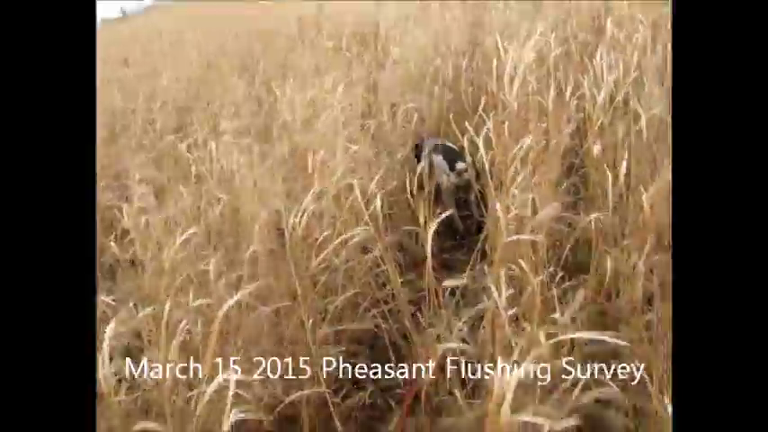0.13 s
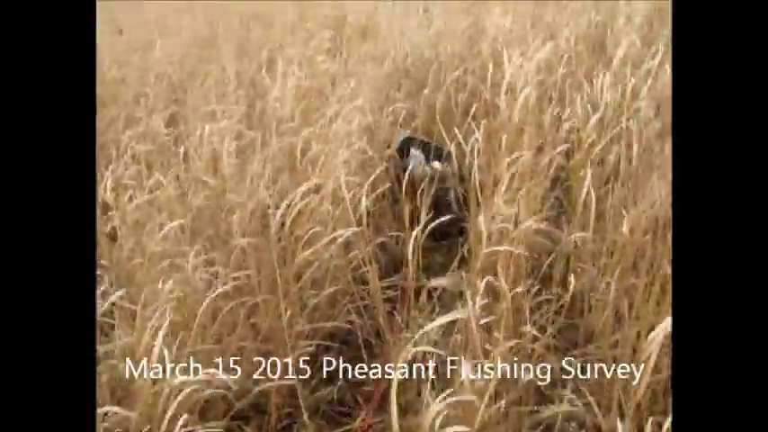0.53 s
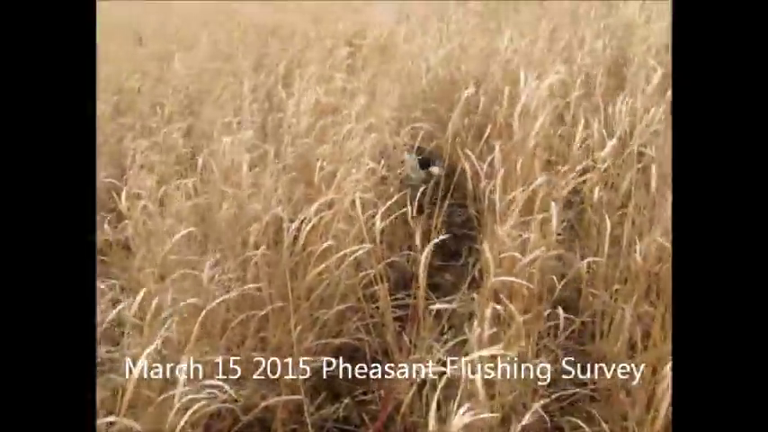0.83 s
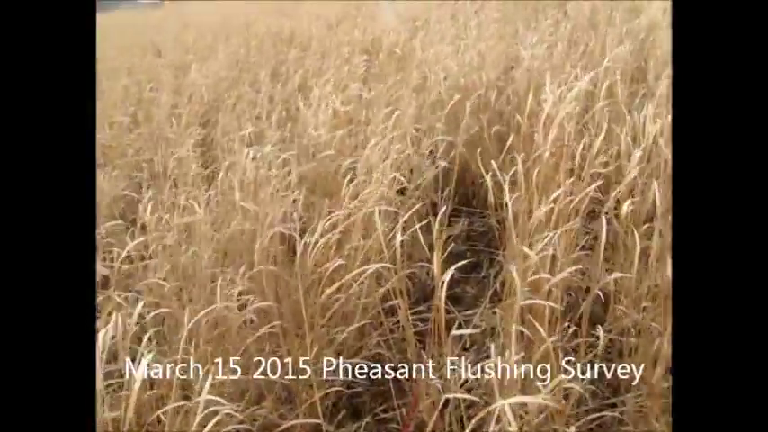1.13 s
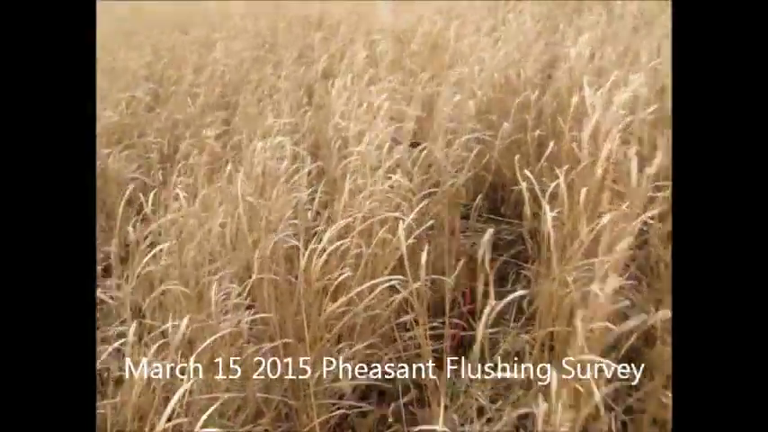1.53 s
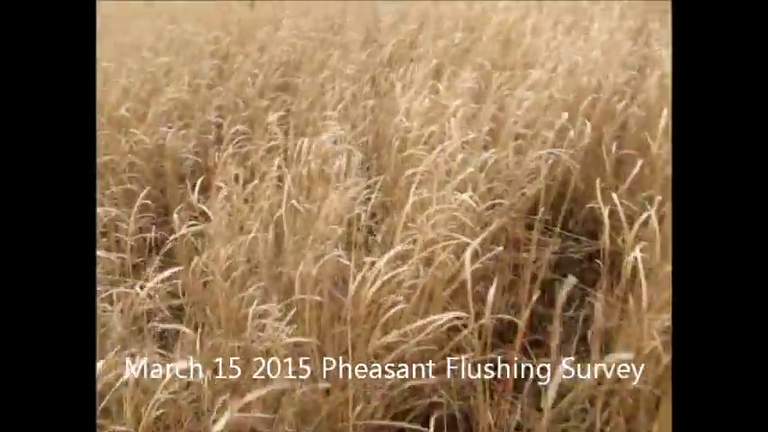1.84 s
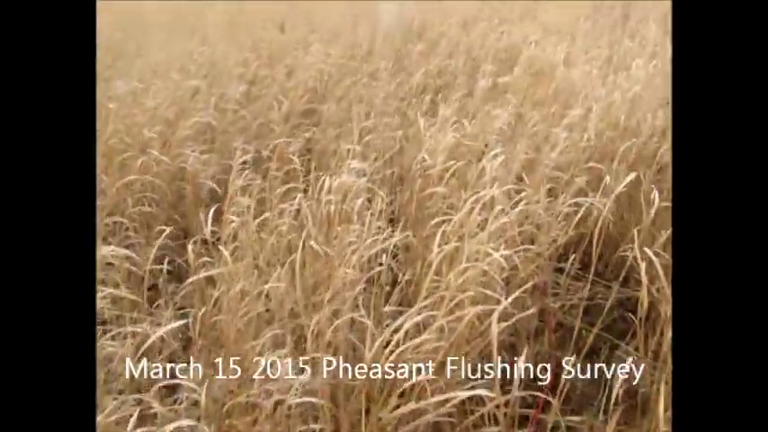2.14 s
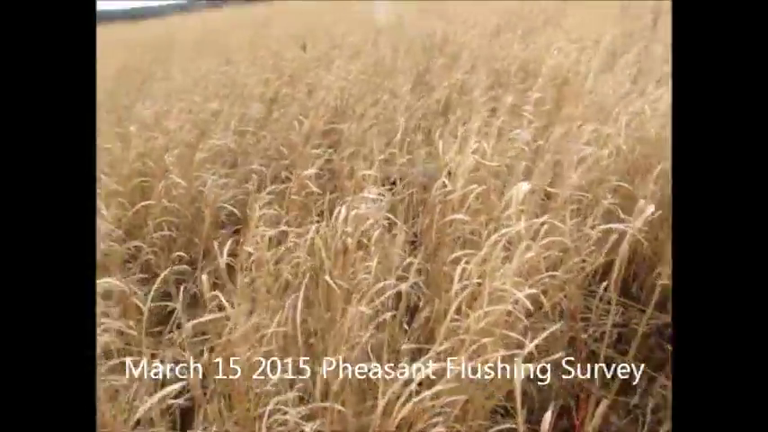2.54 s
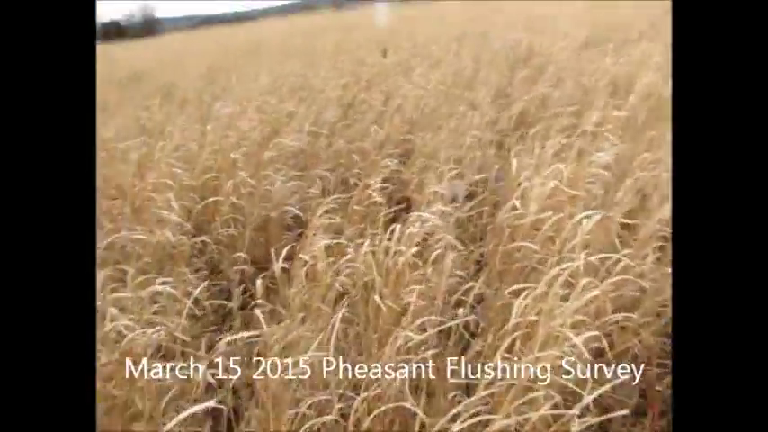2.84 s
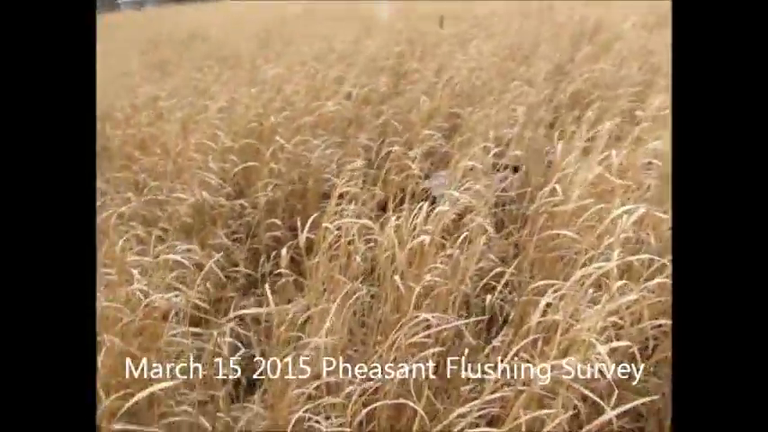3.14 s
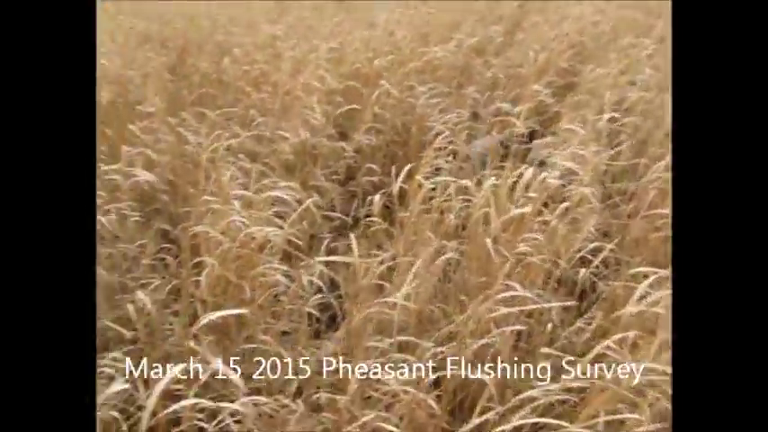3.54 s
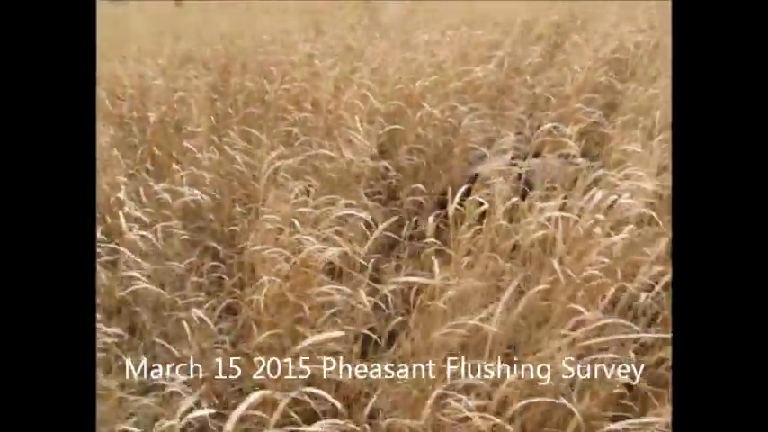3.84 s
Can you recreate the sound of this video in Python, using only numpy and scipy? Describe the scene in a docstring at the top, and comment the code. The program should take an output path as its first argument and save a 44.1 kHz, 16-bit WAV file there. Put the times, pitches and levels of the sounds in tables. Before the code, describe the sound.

Dry grass swishes and crackles close to a handheld microphone in an open field. Strong gusts rumble first, then stalks brush past and stems snap sharply; the wind eases before returning near the end.

```python
"""Walking through tall dry grass on a windy day, heard at two microphone ports over a faint field hush.
After a brief silence strong gusts buffet each port separately: lumpy noise, brighter as it grows.
From about 1.1 s a stalk drags past and others brush by in swishes of hiss and fine crackle, while dry
stems snap close by as short cracks with splintering tails, the hardest near 2.06 and 2.70 s.
The wind sinks between 2 and 3.4 s, then picks up again towards the end."""
import sys
import numpy as np
from scipy import signal
from scipy.fft import rfft, irfft
from scipy.io import wavfile
from scipy.ndimage import uniform_filter1d

SR = 44100
rng = np.random.default_rng(int(sys.argv[2]) if len(sys.argv) > 2 else 0)


def inscribe(sig):
    """Save sig as 16-bit PCM at rate SR to the path in sys.argv[1].

    A 1-D sig is mono; a 2-D sig holds one channel per row.
    Samples are clipped to [-1, 1] before scaling.
    """
    pcm = np.round(np.clip(np.atleast_2d(sig).T, -1, 1) * 32767)
    wavfile.write(sys.argv[1], SR, pcm.astype(np.int16))


N = 176400
TIME_S = np.arange(N) / SR


def gain_of(db):
    """Amplitude factor of a level in dB."""
    return 10 ** (np.asarray(db) / 20)


def evened(x):
    """Scales x to unit RMS."""
    return x / np.sqrt(np.mean(x ** 2) + 1e-20)


def read(points, hz):
    """Interpolates a spectral table over log frequency."""
    table_hz, value = np.transpose(points)
    return np.interp(np.log(hz + 1), np.log(table_hz + 1), value)


def bell(hz, centre_hz, octaves):
    """Gaussian hump on a log-frequency axis; octaves is its standard deviation."""
    return np.exp(-.5 * (np.log2((hz + 1) / centre_hz) / octaves) ** 2)


def wander(seconds):
    """Smooth random curve of unit RMS: noise through two one-pole lowpasses of this time constant."""
    x = rng.standard_normal(N)
    for _ in range(2):
        x = signal.lfilter([1], [1, -np.exp(-1 / (seconds * SR))], x)
    return evened(x - x.mean())


def shaped(x, db_of, size):
    """Colours x in short-time spectra; each frame's gains have unit mean power before its level."""
    overlap = size * 3 // 4
    hz, t, spectra = signal.stft(x, SR, nperseg=size, noverlap=overlap)
    colour_db, level_db = db_of(hz[:, None], t)
    gain = gain_of(colour_db)
    gain = gain / np.sqrt((gain ** 2).mean(0)) * gain_of(level_db)
    return signal.istft(spectra * gain, SR, nperseg=size, noverlap=overlap)[1][..., :N]


# likeness of the two ports: freq_hz, correlation (0-1)
PORT_LIKENESS = [(1400, 0.88), (3000, 0.46), (5500, 0.72), (9000, 0.66), (15000, 0.56)]


def pair(a, b):
    """Two ports that share part of a sound: the right mixes a and b by frequency."""
    same = np.clip(read(PORT_LIKENESS, np.fft.rfftfreq(len(a), 1 / SR)), 0, 1)
    right = irfft(same * rfft(a) + np.sqrt(1 - same ** 2) * rfft(b), len(a))
    return np.array([a, right])


# spectrum of the field hush: freq_hz, density_db (relative, per Hz)
HUSH_SPECTRUM = [(60, 1.5), (400, -14), (1500, -4), (3000, -38.5)]
HUSH_DB = -57


def field_hush():
    """Steady faint hush of the far field: noise of fixed colour."""
    def colour(hz, t):
        return read(HUSH_SPECTRUM, hz) + 0 * t, HUSH_DB
    return shaped(pair(*rng.standard_normal((2, N))), colour, size=1024)


# buffeting spectrum in strong wind: freq_hz, density_db (relative, per Hz)
STRONG_WIND = [(20, -46), (50, -15.5), (113, -3.5), (196, 0), (349, -4), (759, -16), (1880, -32),
               (4000, -54.5)]
# buffeting spectrum in light wind: freq_hz, density_db (relative, per Hz)
LIGHT_WIND = [(20, -27), (45, 12.5), (100, 9), (200, -4.5), (400, -30), (800, -45.5)]
LIGHT_DB, STRONG_DB = -64.5, -15.5  # gust levels at which each spectrum holds
EDDY_DB, EDDY_S, PUFF_DB, PUFF_S = 3.5, 0.0024, 4, 0.014  # fast and slow lumpiness
SLAPS_PER_S, SLAP_DB = 120, -2.5  # single sharp eddies slapping the port


def buffet(gust, tilt_db_per_octave):
    """Turbulence at one port: lumpy noise and slaps, coloured and scaled by gust strength."""
    start_s, level_db = np.transpose(gust)
    eddies_db = EDDY_DB * np.minimum(wander(EDDY_S), 2)
    puffs_db = PUFF_DB * np.minimum(wander(PUFF_S), 1)
    lumpy = gain_of(eddies_db + puffs_db)
    slow_power = uniform_filter1d(uniform_filter1d(lumpy ** 2, size=2600), size=2600)
    lumpy = lumpy / np.sqrt(slow_power)  # leaves the slow level to the gusts
    slaps = evened(np.minimum(rng.exponential(1, N), 2) * (rng.random(N) < SLAPS_PER_S / SR))
    turbulence = rng.standard_normal(N) - gain_of(SLAP_DB) * (slaps - slaps.mean())

    def colour(hz, t):
        gust_db = np.interp(t, start_s, level_db)
        strong_share = np.clip((gust_db - LIGHT_DB) / (STRONG_DB - LIGHT_DB), 0, 1.2)
        light = read(LIGHT_WIND, hz)
        blend = light + strong_share * (read(STRONG_WIND, hz) - light)
        return blend + tilt_db_per_octave * np.log2(hz + 20), 0
    return shaped(evened(turbulence * lumpy), colour, size=2048) * gain_of(np.interp(TIME_S, start_s, level_db))


# gust strength at the left port: start_s, level_db
LEFT_GUSTS = [(0.04, -23), (0.17, -16.5), (0.41, -21.5), (0.47, -46), (0.53, -16.5), (0.6, -23),
              (0.64, -16), (0.71, -20.5), (0.85, -8), (0.95, -30.5), (1.16, -34.5), (1.18, -25),
              (1.32, -15.5), (1.36, -22.5), (1.52, -14.5), (1.61, -22), (1.67, -13), (1.76, -25.5),
              (1.81, -19.5), (1.86, -37), (1.9, -20.5), (2.02, -21.5), (2.12, -43), (2.47, -50.5),
              (2.74, -34.5), (2.95, -68), (3.07, -47), (3.4, -62), (3.47, -39.5), (3.66, -32.5), (3.8, -44),
              (3.89, -26), (3.94, -39), (3.99, -33)]
# gust strength at the right port: start_s, level_db
RIGHT_GUSTS = [(0.05, -25.5), (0.4, -22.5), (0.49, -54), (0.6, -28.5), (0.69, -19), (0.79, -34),
               (0.85, -11.5), (0.95, -37.5), (1.2, -50), (1.42, -31.5), (1.46, -41), (1.51, -20.5),
               (1.91, -31.5), (1.95, -20.5), (2.32, -50.5), (2.67, -35.5), (2.76, -51), (2.87, -42),
               (3.11, -36.5), (3.33, -56.5), (3.64, -30.5), (3.77, -34), (3.8, -24), (3.84, -25.5),
               (3.99, -17.5)]
PORT_TILT_DB_PER_OCTAVE = 0.28


def wind():
    """Independent buffeting per port; the windward left one is brighter."""
    left = buffet(LEFT_GUSTS, PORT_TILT_DB_PER_OCTAVE)
    right = buffet(RIGHT_GUSTS, -PORT_TILT_DB_PER_OCTAVE)
    return np.array([left, right])


CRACKLES_PER_S, CRACKLE_SPREAD_DB, CRACKLE_T60_S, CRACKLE_OCTAVES = 260, 4, 0.0062, 0.94


def crackle():
    """Sparse ticks of uneven size: decaying noise bursts of 24 colours, partly alike at both ports."""
    ticks = rng.random(N) < CRACKLES_PER_S / SR
    size = gain_of(CRACKLE_SPREAD_DB * np.minimum(rng.exponential(1, N), 4)) * ticks
    kind = rng.integers(0, 24, N)
    t, hz = np.arange(1024) / SR, np.fft.rfftfreq(1024, 1 / SR)
    a, b = rng.standard_normal((2, 24, 1024)) * gain_of(-60 * t / CRACKLE_T60_S)
    out = np.zeros((2, N))
    for k, centre_hz in enumerate(np.geomspace(2000, 15000, 24)):
        colour = 0.15 + bell(hz, centre_hz, CRACKLE_OCTAVES)
        delayed = np.roll(pair(a[k], b[k]), 64, axis=1)  # room for the zero-phase filter
        burst = irfft(rfft(delayed) * colour)
        burst = burst / np.linalg.norm(burst)
        out += signal.oaconvolve((size * (kind == k))[None], burst, axes=1)[:, :N]
    return evened(out)


# swish strength: start_s, level_db
SWISH_LEVELS = [(0.37, -49), (0.44, -44), (0.81, -38.5), (0.9, -46), (1.04, -42), (1.17, -32),
                (1.23, -37.5), (1.42, -33), (1.48, -37), (1.56, -32), (1.61, -38.5), (1.89, -42),
                (2.02, -38.5), (2.06, -34), (2.099, -45), (2.25, -38.5), (2.33, -35.5), (2.42, -39),
                (2.71, -32.5), (2.75, -40.5), (2.87, -36.5), (2.98, -38.5), (3.04, -33.5), (3.35, -41.5),
                (3.55, -36.5), (3.99, -38.5)]
# spectrum of rubbing stalks: freq_hz, density_db (relative, per Hz)
STALK_SPECTRUM = [(500, -11.5), (1100, -10.5), (2200, -6), (4800, -3.5), (8000, -5.5), (11700, -6),
                  (15600, -9)]
CRACKLE_DB = -10  # before the common evening with the rub
FLICKER_DB, FLICKER_S, PATCH_DB = 1.47, 0.0058, 1.46  # RMS level flicker, RMS spectral patches
BRIGHTEN_DB_PER_OCTAVE_PER_DB = 0.047  # hard brushing is brighter
SCRAPE_S, SCRAPE_HALF_S, SCRAPE_HZ, SCRAPE_DB, SCRAPE_OCTAVES = 1.142, 0.017, 4570, 6, 0.59


def swish():
    """Stalks rubbing: flickering, patchy hiss plus crackle under one level curve; one stalk drags past."""
    start_s, level_db = np.transpose(SWISH_LEVELS)
    rub = rng.standard_normal((2, N)) * gain_of(FLICKER_DB * wander(FLICKER_S))
    drive = evened(pair(*rub) + gain_of(CRACKLE_DB) * crackle())

    def colour(hz, t):
        patches = rng.standard_normal((len(t), len(hz))).T
        patches = uniform_filter1d(patches, size=10, axis=0)
        patches = evened(uniform_filter1d(patches, size=16, axis=1))
        scrape_time = np.exp(-((t - SCRAPE_S) / SCRAPE_HALF_S) ** 4)
        scrape_db = SCRAPE_DB * bell(hz, SCRAPE_HZ, SCRAPE_OCTAVES) * scrape_time
        excess_db = np.interp(t, start_s, level_db) - level_db.mean()
        tilt_db = BRIGHTEN_DB_PER_OCTAVE_PER_DB * excess_db * np.log2((hz + 2670) / 5030)
        colour_db = read(STALK_SPECTRUM, hz) + tilt_db + scrape_db + PATCH_DB * patches
        return colour_db, .5 * scrape_db.max(0)
    return shaped(drive, colour, size=256) * gain_of(np.interp(TIME_S, start_s, level_db))


def minimum_phase(colour):
    """Gives a magnitude spectrum the phase that makes it ring only after the break."""
    log_magnitude = np.log(np.r_[colour, colour[-2:0:-1]])
    return colour * np.exp(-1j * signal.hilbert(log_magnitude).imag[:len(colour)])


# snapping stems: start_s, peak_db (mean of both ports), centre_hz, body_db (low woody hump)
STEM_SNAPS = [(1.178, -16, 3900, -4), (1.296, -15.5, 4340, -25), (1.3932, -16, 6060, -20),
              (1.4197, -8, 9800, 0), (1.6899, -16, 11000, 12), (1.7674, -13, 10100, -5),
              (2.0346, -16, 9000, -1), (2.0503, -6, 6000, -9), (2.06, -1.5, 6600, 3),
              (2.295, -19.5, 8100, -18), (2.323, -22.5, 2870, -14), (2.3672, -20, 7450, -12),
              (2.5539, -9, 5230, 0), (2.574, -19.5, 7040, -30), (2.7048, 2.5, 10460, -42),
              (2.817, -14, 11000, -2), (3.028, -17.5, 5400, -14), (3.07, -18, 7820, -10),
              (3.0903, -10.5, 12100, -16), (3.7417, -21.5, 11100, -10), (3.776, -23.5, 5000, -26)]
SNAP_LAG_S, LEAD_S = .0006, .002  # break after start_s, buffer before start_s
CRACK_T60_S, CRACK_OCTAVES, CRACK_SIDE = 0.0017, 0.59, 0.65  # side: gain of the unshared crack
SPLINTER_DB, SPLINTER_T60_S = -13, 0.021
BODY_HZ, STEM_HZ, STEM_HALF_HZ, STEM_DB, BROAD_DB = 2670, 5030, 400, -3.5, -13.5


def snaps():
    """Each stem breaks in a sharp crack and a slower splintering tail, ringing around its centre."""
    out = np.zeros((2, N))
    t, hz = np.arange(2048) / SR - LEAD_S, np.fft.rfftfreq(2048, 1 / SR)
    broken, late_s = t >= SNAP_LAG_S, abs(t - SNAP_LAG_S)
    crack = broken * gain_of(-60 * late_s / CRACK_T60_S)
    stem = gain_of(STEM_DB) / (1 + ((hz - STEM_HZ) / STEM_HALF_HZ) ** 2)
    broad = gain_of(BROAD_DB) * hz / (hz + STEM_HZ / 2)
    noise = rng.standard_normal((len(STEM_SNAPS), 4, 2048))
    for (start_s, peak_db, centre_hz, body_db), (a, b, c, d) in zip(STEM_SNAPS, noise):
        # the smaller the snap, the larger its share of splinter
        splinter = broken * gain_of(SPLINTER_DB - .5 * peak_db - 60 * late_s / SPLINTER_T60_S)
        body = gain_of(body_db) * bell(hz, BODY_HZ, CRACK_OCTAVES)
        colour = minimum_phase(bell(hz, centre_hz, CRACK_OCTAVES) + body + broad + stem)
        cracks = pair(crack * np.sign(a), CRACK_SIDE * crack * c)
        both = irfft(rfft(cracks + splinter * pair(d, b)) * colour)
        both = gain_of(peak_db) * both / abs(both.mean(0)).max()
        part = out[:, round((start_s - LEAD_S) * SR):][:, :2048]
        part += both[:, :part.shape[1]]
    return out


def scene():
    """Field hush, wind at each port, brushing grass and snapping stems."""
    return field_hush() + wind() + swish() + snaps()


START_S, HEADROOM, EDGE_HZ = .0354, 1.3, 15850


def record(dry):
    """Input stage overloads softly and opens after a short silence; then a lowpass limits the band."""
    overloaded = HEADROOM * np.tanh(dry / HEADROOM)
    opening = np.clip((TIME_S - START_S) * SR / 32, 0, 1)  # 32-sample ramp
    lowpass = signal.firwin(511, EDGE_HZ, window=("kaiser", 9), fs=SR)
    return signal.oaconvolve(overloaded * opening, lowpass[None], "same")


dry = scene()
out = record(dry)
inscribe(out)
```